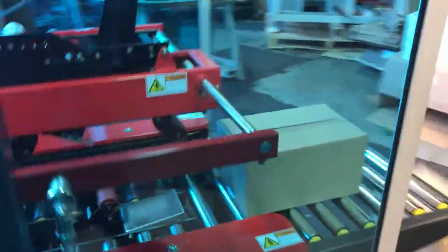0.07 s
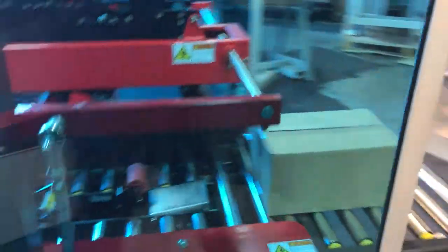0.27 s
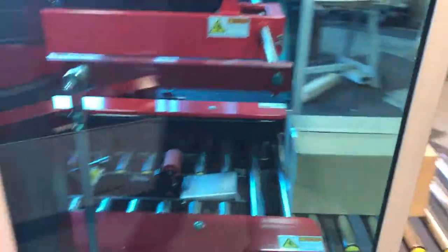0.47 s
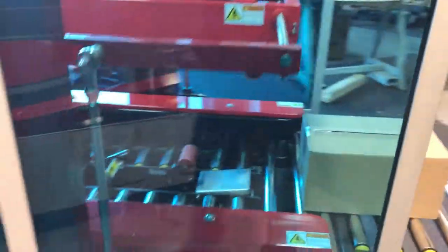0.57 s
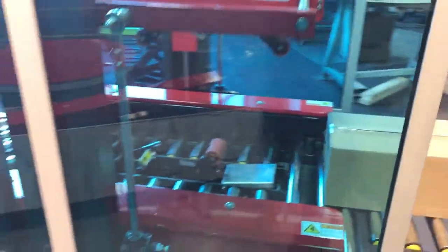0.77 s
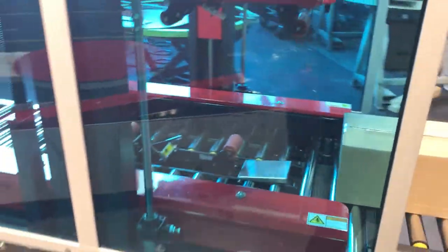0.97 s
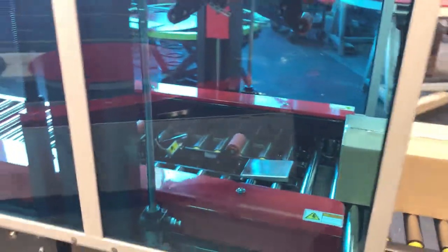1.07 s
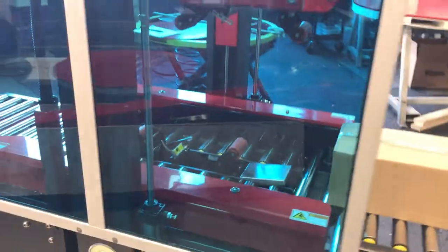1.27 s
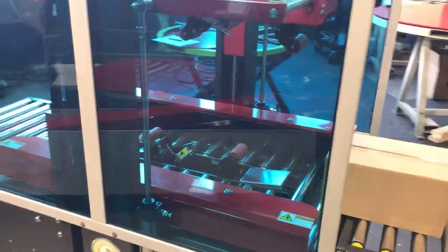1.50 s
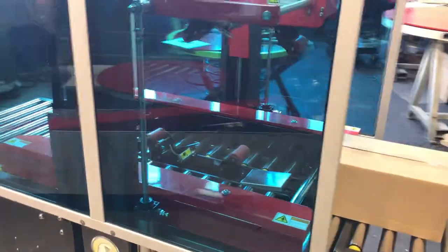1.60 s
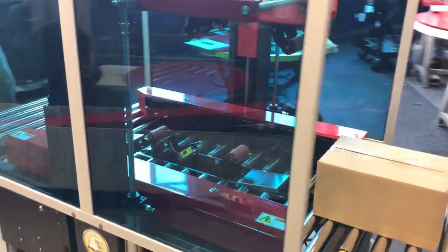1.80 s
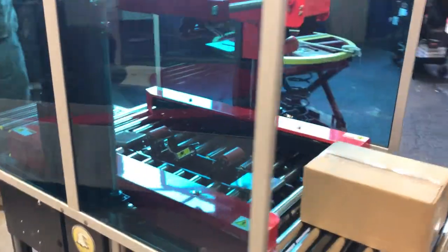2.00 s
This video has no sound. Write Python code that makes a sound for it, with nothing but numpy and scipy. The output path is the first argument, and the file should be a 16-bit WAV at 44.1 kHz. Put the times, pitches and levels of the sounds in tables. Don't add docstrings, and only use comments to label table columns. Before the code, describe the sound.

A pneumatic carton sealer hisses, slams with a metallic clank, thuds, then vents a burst of air

```python
import sys
import numpy as np
from scipy import signal
from scipy.fft import rfft, irfft, next_fast_len
from scipy.io import wavfile
from scipy.ndimage import uniform_filter1d, map_coordinates

SR = 44100
rng = np.random.default_rng(int(sys.argv[2]) if len(sys.argv) > 2 else 0)


def boost(x):
    u = np.asarray(x, float) / 20
    return 10 ** u


def put_to_file(sound):
    columns = np.atleast_2d(sound).T
    safe = np.clip(columns, -1, 1)
    whole_steps = np.round(safe * 32767)
    wavfile.write(sys.argv[1], SR, whole_steps.astype(np.int16))


N = 90404
T = np.arange(N) / SR
SLAM_S = 0.223


def unit(x):
    return x / np.sqrt(np.mean(x ** 2) + 1e-20)


def along(points, hz):
    point_hz, value = np.transpose(points)
    return np.interp(np.log(hz + 1), np.log(point_hz + 1), value)


def wobble(rate):
    knots = rng.standard_normal(int(N * rate / SR) + 4)
    return map_coordinates(knots, [T * rate])


def release(start_s, t60):
    return boost(-60 * np.maximum(T - start_s, 0) / t60)


def struck(start_s, t60):
    return release(start_s, t60) * (T > start_s)


def filtered(x, response):
    m = next_fast_len(N + SR // 2)
    return irfft(rfft(x, m) * response(np.fft.rfftfreq(m, 1 / SR)), m)[:N]


def rush(spectrum, pipe, patchy_db):
    z = signal.stft(rng.standard_normal(N), nperseg=512)[2]
    field = uniform_filter1d(rng.standard_normal(z.shape), size=3, axis=0)
    field = uniform_filter1d(field, size=13, axis=1)
    x = signal.istft(z * boost(patchy_db * unit(field)), nperseg=512)[1][:N]

    def colour(f):
        resonance_db = sum(db / (1 + (2 * (f - centre) / width) ** 2) for centre, width, db in pipe)
        return boost(along(spectrum, f) + resonance_db)

    return unit(filtered(x, colour))


def ring(modes, start_s, rise_s, scatter_db, bright_db=0):
    t = T[:SR // 3]
    x = 0
    for hz, db, t60 in modes:
        bloom = 1 - np.exp(-t / (rise_s * 1000 / hz))
        level_db = db + bright_db * (hz > 600) + scatter_db * rng.normal()
        x = x + bloom * boost(level_db - 60 * t / t60) * np.sin(2 * np.pi * hz * t)
    return np.pad(x, (round(start_s * SR), N))[:N]


def hall(x):
    # frequency in Hz, t60 in seconds.
    reverb = [(100, 0.94), (500, 2.03), (2000, 1.52), (6000, 1.1), (12000, 0.44)]
    hz, t, z = signal.stft(rng.standard_normal(SR + SR // 2), SR, nperseg=256)
    tail = signal.istft(z * boost(-60 * t / along(reverb, hz)[:, None]), SR, nperseg=256)[1]
    return signal.fftconvolve(np.pad(x, (500, 0)), tail / np.linalg.norm(tail))[:N]


def carriage():
    # start in seconds, strength in dB, brightness in dB.
    slams = [(0.2236, -2.5, 1.5), (0.2287, -3.5, -1), (0.243, -18, 0), (0.257, -15, -9),
             (0.266, -16.5, -24), (.279, -14, -31), (0.3283, -18.5, -20), (0.346, -16.5, -16),
             (0.355, -21.5, -8)]
    # frequency in Hz, level in dB, t60 in seconds.
    modes = [(102, -5, 0.095), (151.2, -10, 0.081), (244, -4.5, 0.035), (295, -2, 0.083), (350, -4, 0.049),
             (374.5, -5.5, 0.04), (560, -8.5, 0.032), (1100, 1.5, 0.037), (1274, -2.5, 0.038),
             (1400, -8.5, 0.022), (814, -11, 0.024), (3470, -13, 0.027), (4300, -15, 0.028)]
    # frequency in Hz, density in dB per Hz.
    shudder = [(45, -39), (140, 0.5), (400, -3), (500, -20), (700, -10.5), (1200, -7.5), (1900, -13.5),
               (3000, -28)]
    # centre in Hz, width in Hz, level in dB.
    frame = [(181, 30, 9.5), (363, 50, 3), (420, 44, 5.5), (1190, 370, 0.5)]
    # start in seconds, ring in dB, hiss in dB, t60 in seconds.
    knocks = [(.329, -28, -42, .03), (.3322, -19, -33, .03), (.3372, -23, -38, .03), (.4245, -36, -34, .02),
              (1.1095, -23, -29, .012), (1.116, -30, -32, .04), (1.3232, -41, -38, .02),
              (1.3295, -50, -42, .02)]
    # frequency in Hz, level in dB.
    steel = [(1300, -6), (1630, 0), (1910, 1), (2150, -1), (2450, -3), (3480, -6), (3950, -7), (5200, -8)]
    # start in
    # seconds, frequency in Hz, level in dB, t60 in seconds.
    lone_tones = [(.217, 1420, -30, .1), (.433, 1050, -30, .06), (.447, 1150, -26, .05), (1.292, 1500, -42, .04),
                  (1.197, 282, -30, .2), (1.2289, 285, -19, .11), (1.27, 280, -31, .25), (1.325, 285, -33, .15)]

    body = sum(boost(db - 2.5) * ring(modes, s, rise_s=0.00054, scatter_db=1, bright_db=bright_db)
               for s, db, bright_db in slams)
    crack_air = [(300, -31), (1200, 10), (2000, 0.5), (6000, -8.0), (15000, -32)]
    crack = boost(-13) * struck(SLAM_S, 0.063) * rush(crack_air, [], patchy_db=0.5)

    swell = struck(SLAM_S, 0.51) - struck(SLAM_S, 0.022)
    shake = swell * rush(shudder, frame, patchy_db=4.0)

    scrape = sum(boost(hiss_db) * struck(s, t60) for s, _, hiss_db, t60 in knocks)
    hiss = scrape * rush([(500, -15), (1500, 1), (15000, -7)], [], patchy_db=0)
    ticks = sum(boost(db) * ring([(hz, mode_db, t60) for hz, mode_db in steel], s, rise_s=0.001, scatter_db=1.5)
                for s, db, _, t60 in knocks)

    boom = boost(-14) * struck(SLAM_S, 0.071) * rush(shudder, frame, patchy_db=3.0)
    snap_air = [(1500, -20), (2800, 0), (6500, -2), (15000, -5)]
    snap = boost(-16) * struck(slams[0][0], 0.016) * rush(snap_air, [], patchy_db=0)
    chirps = sum(ring([(hz, db, t60)], s, rise_s=0.003, scatter_db=0) for s, hz, db, t60 in lone_tones)

    shake = boost(-26 + wobble(47)) * shake
    echo = hall(boom + boost(-12.5) * (crack + ticks))
    return body + snap + chirps + crack + shake + hiss + ticks + echo


def vent():
    # time in seconds, flow in dB.
    flow = [
        (1.375, -45),
        (1.412, -37.5),
        (1.4259, -26),
        (1.46, -23.5),
        (1.56, -20),
        (1.63, -22.5),
        (1.67, -28.5),
        (1.72, -43),
    ]
    # frequency in Hz, density in dB per Hz.
    jet_air = [(71, -18), (170, -5.5), (500, -11), (833, -3), (1810, -5.5), (5330, -3), (8000, -7),
               (15700, -15)]
    # centre in seconds, then a list of
    # frequency in Hz, width in Hz, level over the jet in dB.
    stages = [
        (1.44, [(350, 9.1, 8), (1032, 62, 11), (1580, 250, 11.5), (2085, 120, 11.5), (4040, 190, 9.5), (7440, 430, 6)]),
        (1.503, [(357, 16.4, 23), (172, 24, -1), (836, 49, 11.5), (1290, 390, 10), (1960, 37, 15.5), (4243, 44, 22), (6040, 250, 6.5)]),
        (1.572, [(172, 24, 19.5), (2312, 150, 14.5), (3800, 110, 12), (4740, 89, 11), (5200, 150, 15.5), (8740, 260, 5)]),
        (1.64, [(172, 20, -4), (350, 140, 10), (880, 95, 15), (1160, 77, 3), (1604, 75, 17), (4690, 110, 10)]),
    ]

    s, db = np.transpose(flow)
    flow_db = np.interp(T, s, db, left=-120) - 60 * np.maximum(T - s[-1], 0) / 0.36
    sputter_fade = np.exp(-np.abs(T - 1.425) / 0.27)
    sputter_db = 1.5 * sputter_fade * np.cos(2 * np.pi * 46.7 * (T - 1.428))

    centres = [centre_s for centre_s, _ in stages]
    jet = 0
    for share, (_, pipe) in zip(np.eye(len(centres)), stages):
        jet = jet + np.sqrt(np.interp(T, centres, share)) * rush(jet_air, pipe, patchy_db=1.0)

    open_s, opening_s = 1.426, 0.012
    fizz = filtered(jet, lambda f: 1 / (1 + (6400 / (f + 1)) ** 4))
    fizz_db = np.interp(T, [open_s - opening_s, open_s], [-10, 3]) - 19 * (T - open_s)
    jet = jet - fizz + fizz * boost(fizz_db)

    off_axis_pipe = [(172, 38, 9.0), (395, 70, 5), (270, 80, 4), (1190, 780, 4), (1620, 56, 3),
                     (5200, 1300, 1.5), (14800, 1600, -4)]
    off_axis = rush(jet_air, off_axis_pipe, patchy_db=2.5)
    direct = boost(flow_db + 1.0 + sputter_db + 1.16 * wobble(40.29)) * jet
    return direct + boost(-4) * hall(boost(flow_db) * off_axis)


def thud():
    # start in seconds, strength in dB.
    bounces = [
        (1.1125, -8),
        (1.123, -11.5),
        (1.143, -19.5),
        (1.158, -18.5),
        (1.186, -21),
    ]
    # frequency in Hz, level in dB, t60 in seconds.
    box = [(67, -14, 0.11), (132, -13, 0.18), (160, -4, 0.073), (182.4, -4.5, 0.062), (223, -16, 0.024),
           (268, 2, 0.072), (286, -28, 0.068), (417, -18, 0.032), (1174, -18.5, 0.045)]
    start_s = bounces[0][0]
    buzz_air = [(350, -22), (650, -4), (1000, 0.5), (1500, -8), (2500, -47)]
    buzz = boost(-37.5) * struck(start_s, 0.38) * rush(buzz_air, [], patchy_db=-2)
    knocks = sum(boost(db) * ring(box, s, rise_s=0.0011, scatter_db=2.0, bright_db=-12 * (k > 1))
                 for k, (s, db) in enumerate(bounces))
    return buzz + knocks


def cylinder():
    # frequency in Hz, density in dB per Hz.
    first_air = [(290, -1), (600, -11), (1400, -8.5), (3030, -8), (4170, -3), (5970, -7.5), (9000, -10),
                 (15700, -10)]
    second_air = [(290, -56), (500, -18), (1110, -8.5), (2440, -7.5), (4540, -2.5), (7000, -8.5),
                  (9000, -9.5), (15700, -9.5)]
    seal_air = [(4000, -38), (5200, -3), (6500, 3), (6900, -8), (7300, -11), (15700, -23)]
    # centre in Hz, width in Hz, level in dB.
    first_pipe = [(1880, 50, 12.5), (2350, 26, 10.4), (3710, 53, 9), (4150, 140, 10), (4430, 200, 4.6),
                  (11400, 300, 4.6)]
    second_pipe = [(400, 140, 18), (1116, 82, 9.3), (1644, 87, 9.4), (2110, 13, 13.6), (3390, 36, 8.6),
                   (4440, 110, 3.7), (5290, 58, 6.5), (6905, 120, 10.6), (11500, 200, 8), (12900, 190, 7.7),
                   (13500, 120, 4.3)]
    # time in seconds, level in dB.
    second_flow = [(0.25, -38.5), (0.486, -35), (0.798, -35), (0.968, -34.5), (1.1, -36)]

    first = boost(-31.5 + wobble(13)) * release(SLAM_S, 0.1) * rush(first_air, first_pipe, patchy_db=2.0)
    flow_db = np.interp(T, *np.transpose(second_flow)) + 0.73 * wobble(12.43) + 1.4
    flow = (T > SLAM_S) * boost(flow_db) * release(1.122, 0.071)
    leak = boost(-52) * release(1.26, 0.044) * rush(seal_air, [], patchy_db=1.0)
    second = flow * rush(second_air, second_pipe, patchy_db=1.0)
    return first + leak + second


def hall_rumble():
    # frequency in Hz, density in dB per Hz.
    rumble = [(30, 2.5), (134, -0.5), (285, -4), (420, -11), (520, -15), (1500, -20), (9500, -26.5),
              (15700, -27)]
    return boost(-42.5 + 0.6 * wobble(5)) * rush(rumble, [(180, 40, 4), (370, 60, 4)], patchy_db=0.8)


def scene():
    parts = [(cylinder(), -11.5), (thud(), -16.5)]
    mix = hall_rumble() + carriage() + vent()
    for source, wet_db in parts:
        mix = mix + source + boost(wet_db) * hall(source)
    return mix[None]


def band_limit(x):
    return signal.sosfilt(signal.butter(12, 17010, fs=SR, output="sos"), x)


def record(dry):
    # frequency in Hz, level in dB.
    mic = [(20, -41), (45, -4.5), (80, 0.5), (7200, -1.5), (7700, -2), (10400, -3.5), (11300, -2.5),
           (15600, -4)]
    x = filtered(dry[0], lambda f: boost(along(mic, f)) * (f < 15780))
    x = x / (1 + np.abs(x / 0.72) ** 6) ** (1 / 6)
    return band_limit(x[None])


dry = scene()
out = record(dry)
put_to_file(out)
```